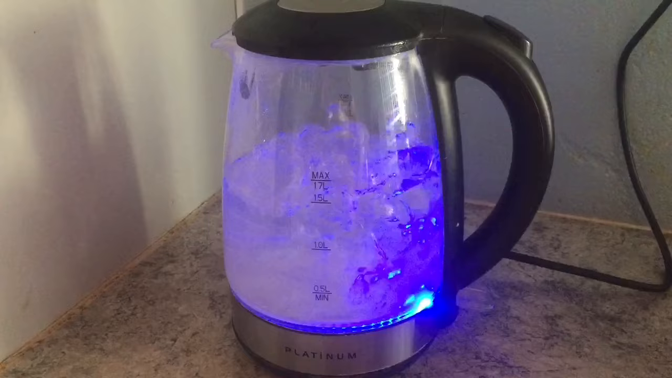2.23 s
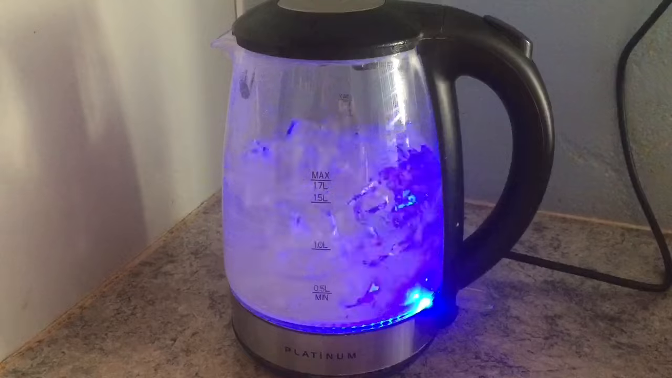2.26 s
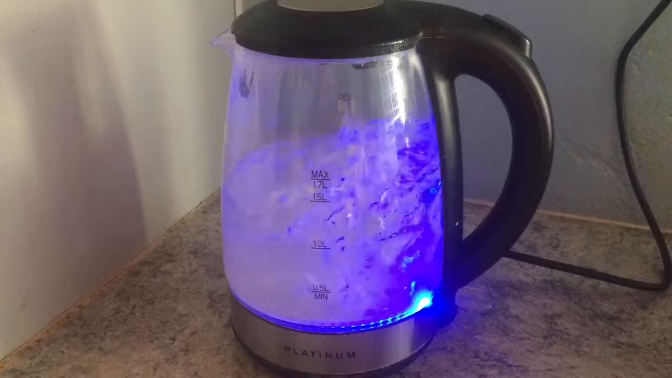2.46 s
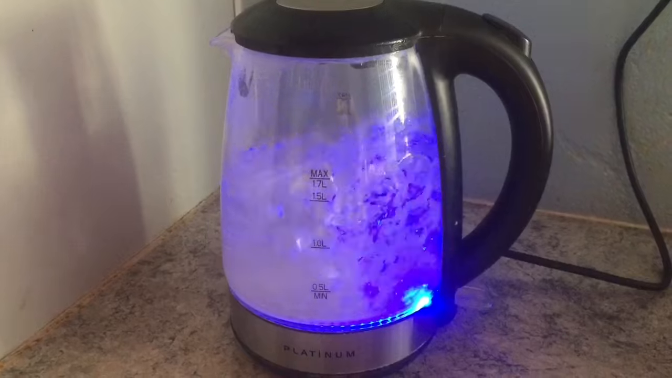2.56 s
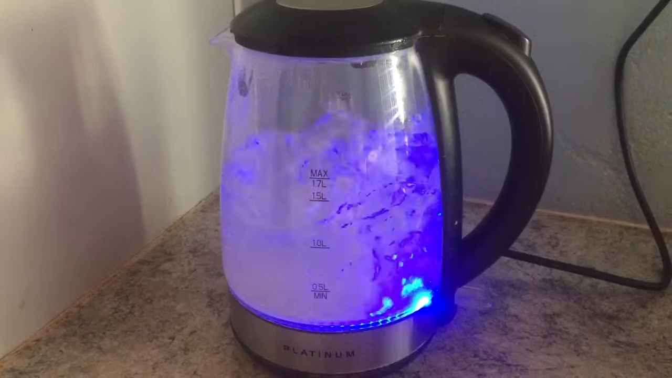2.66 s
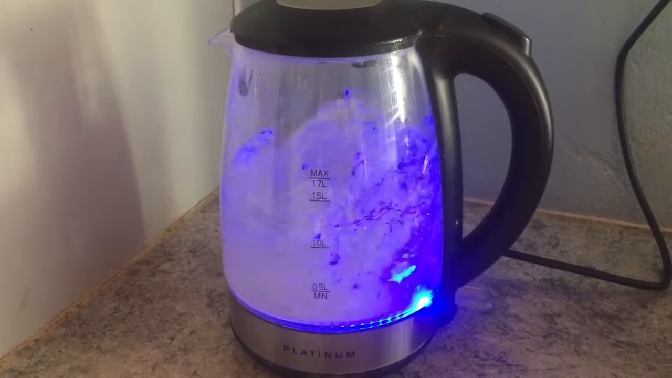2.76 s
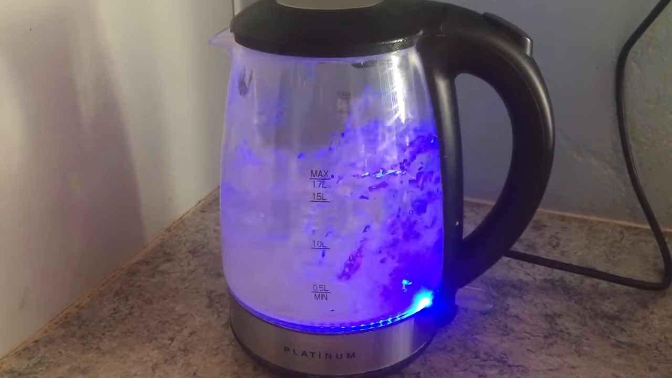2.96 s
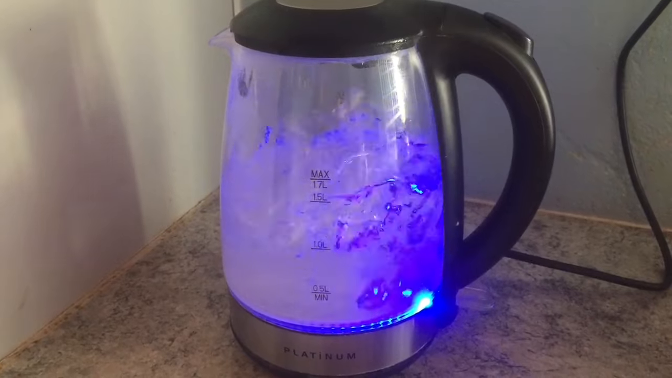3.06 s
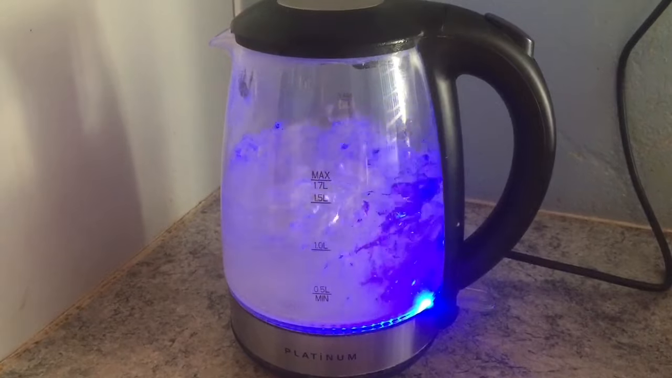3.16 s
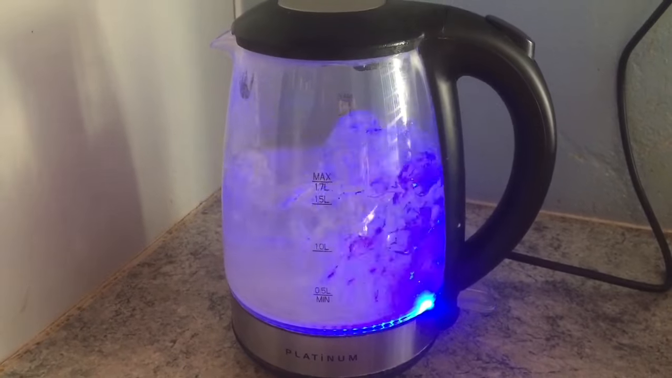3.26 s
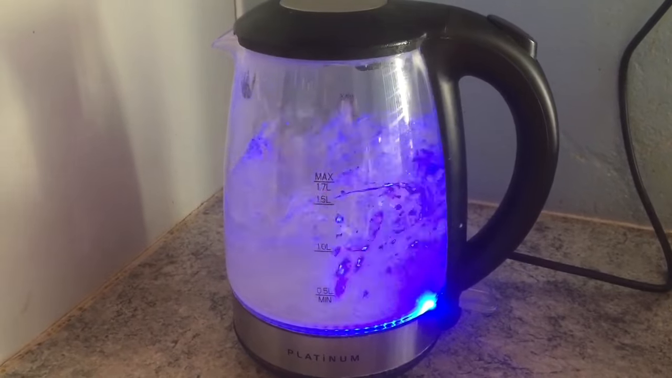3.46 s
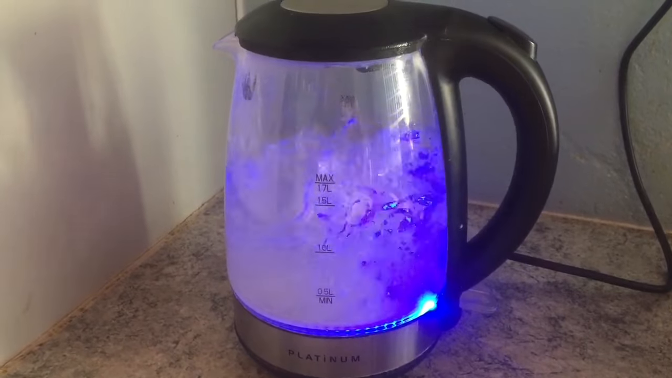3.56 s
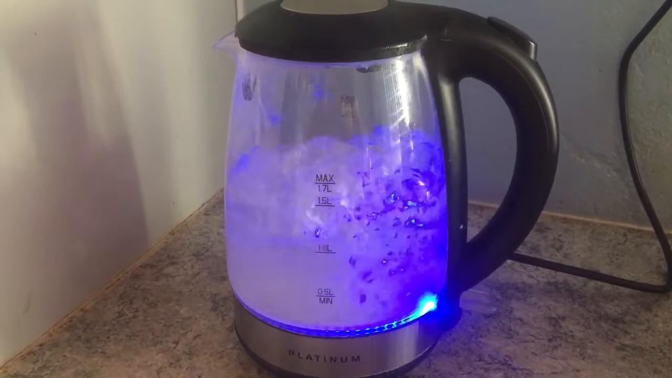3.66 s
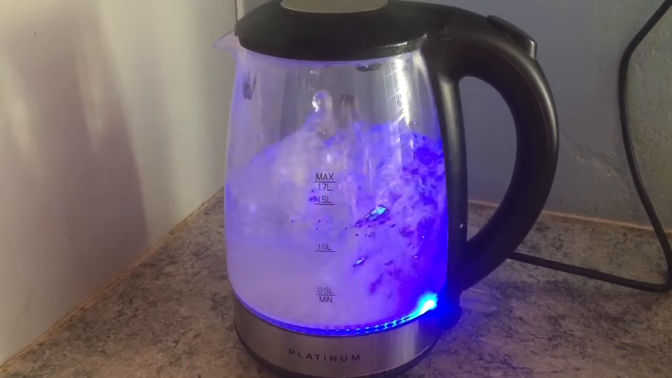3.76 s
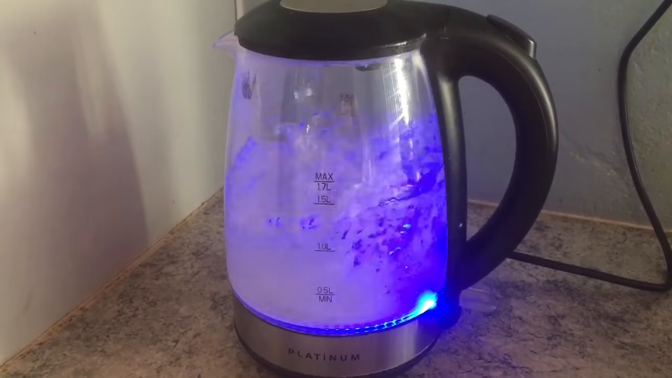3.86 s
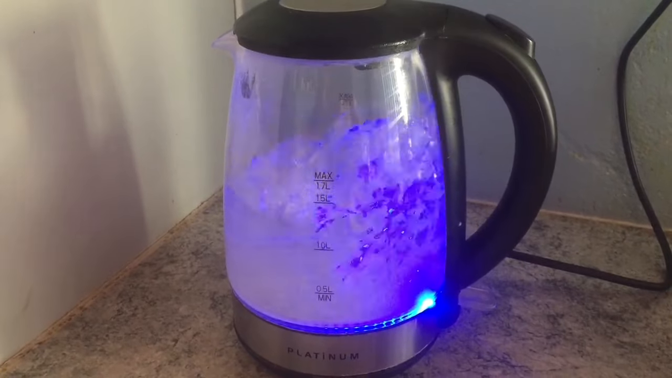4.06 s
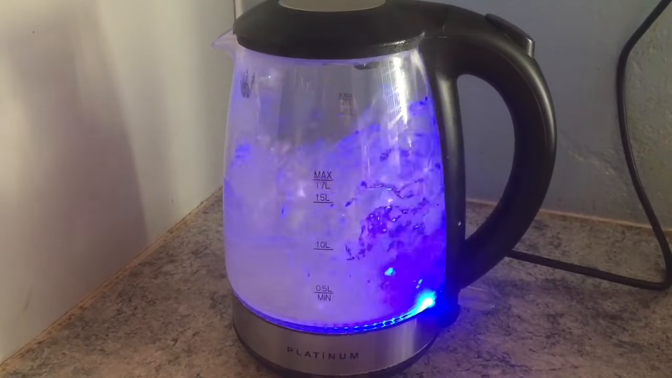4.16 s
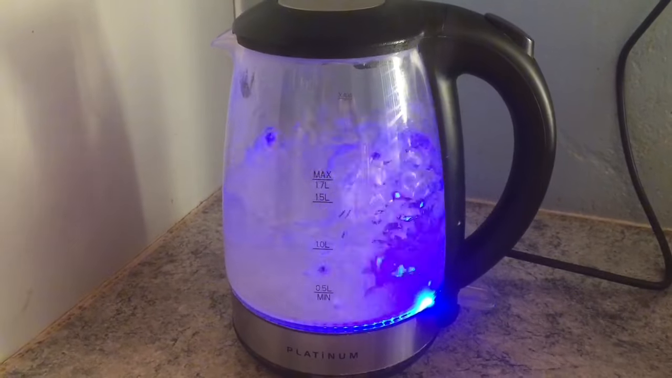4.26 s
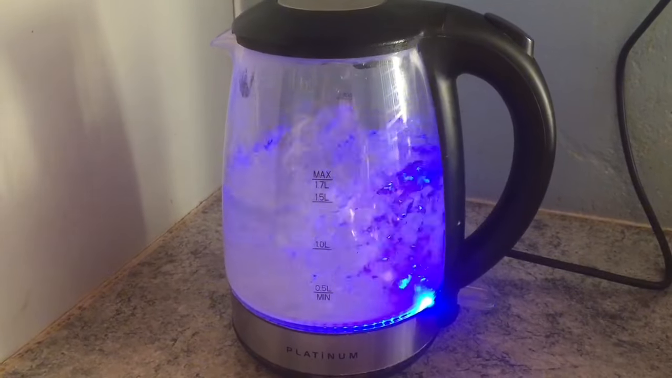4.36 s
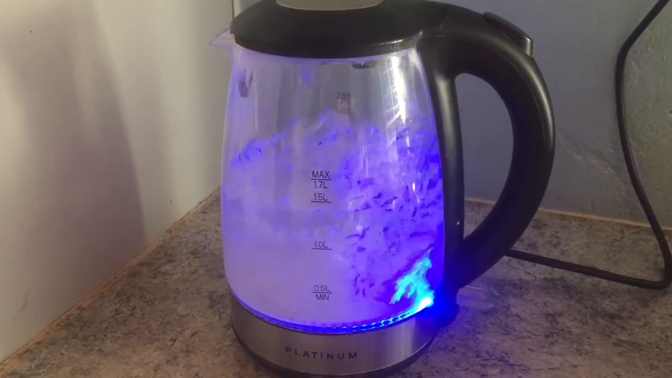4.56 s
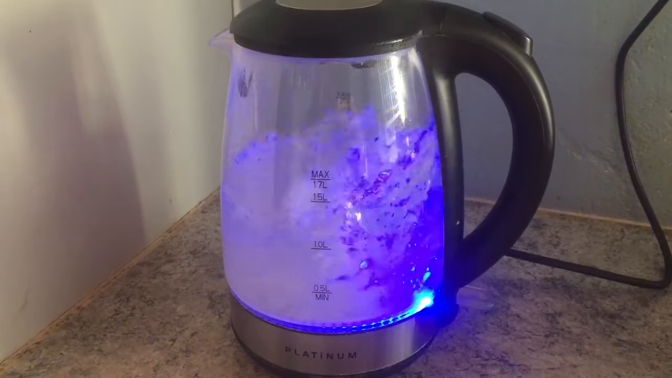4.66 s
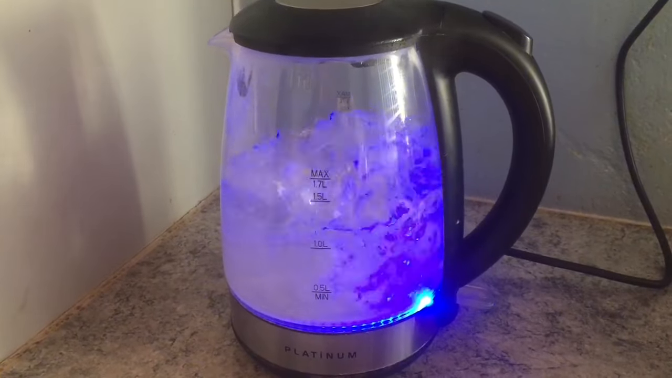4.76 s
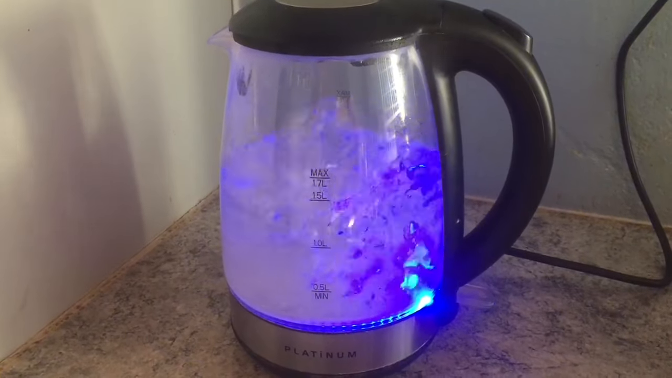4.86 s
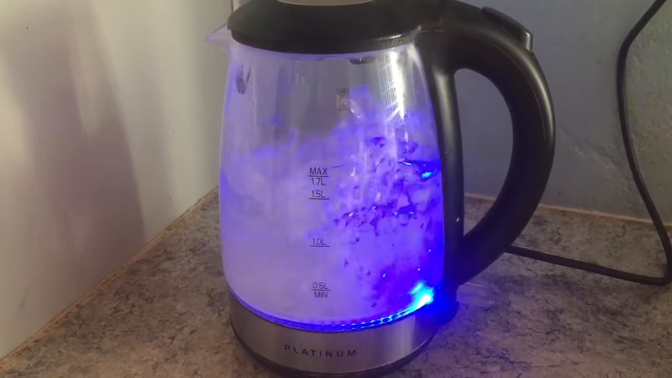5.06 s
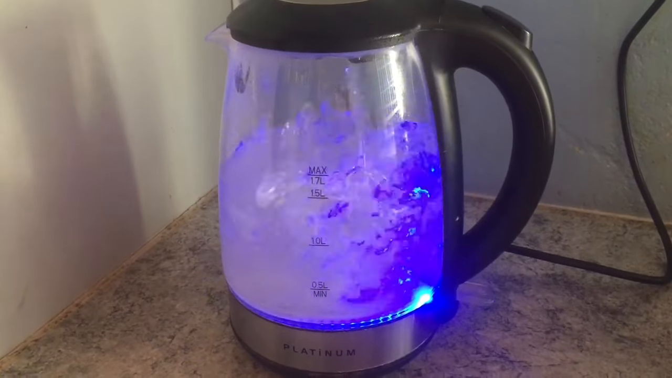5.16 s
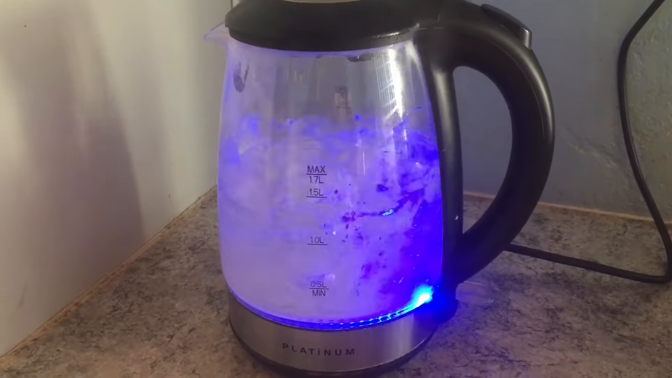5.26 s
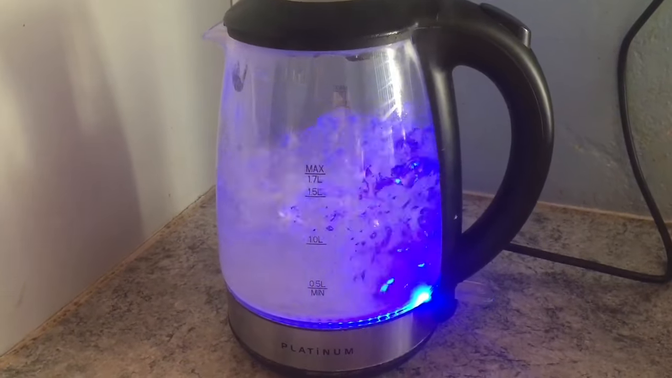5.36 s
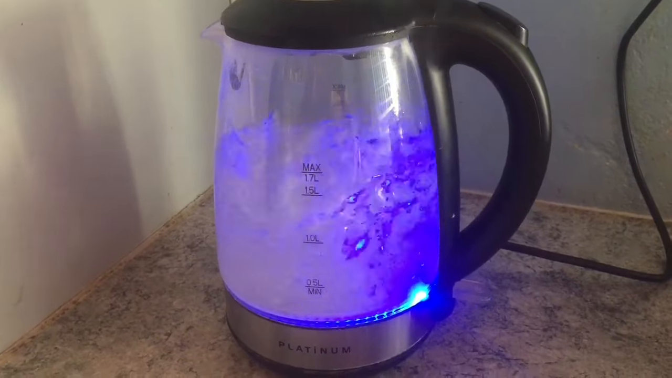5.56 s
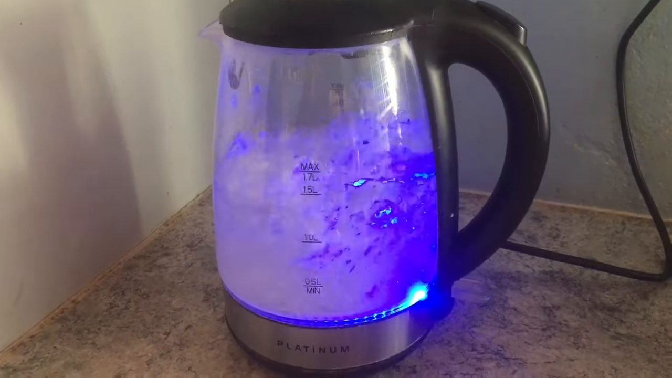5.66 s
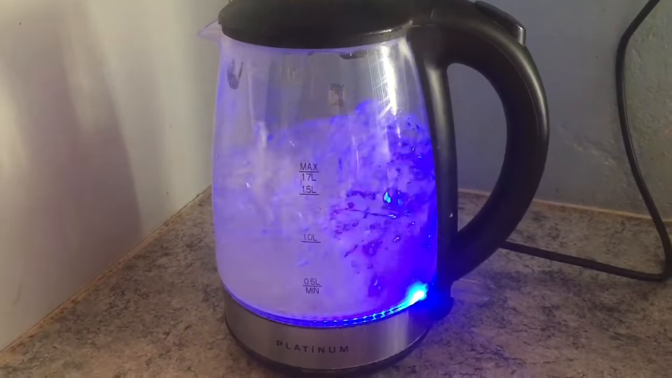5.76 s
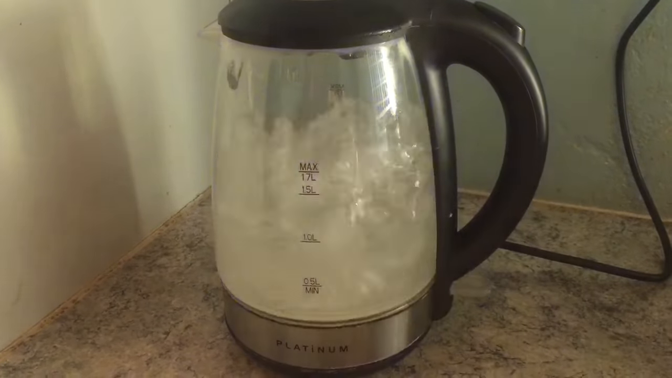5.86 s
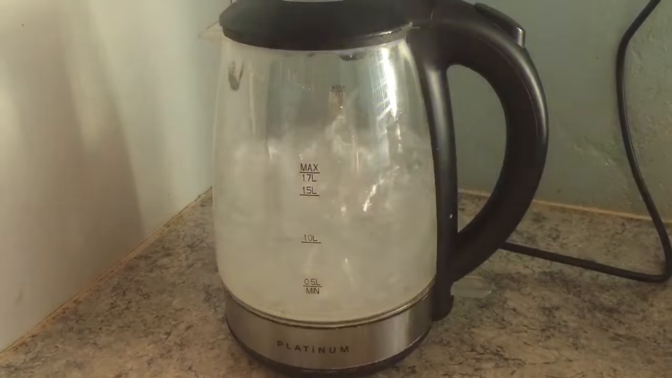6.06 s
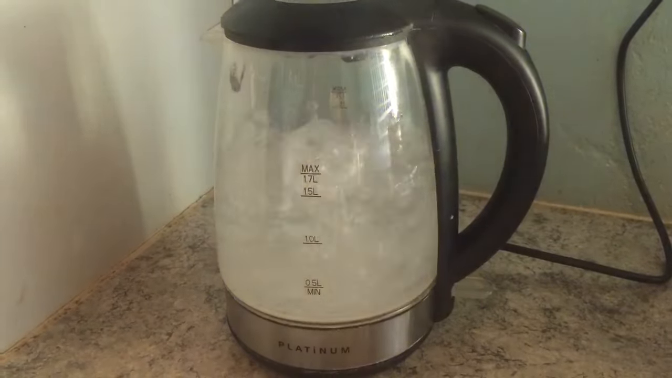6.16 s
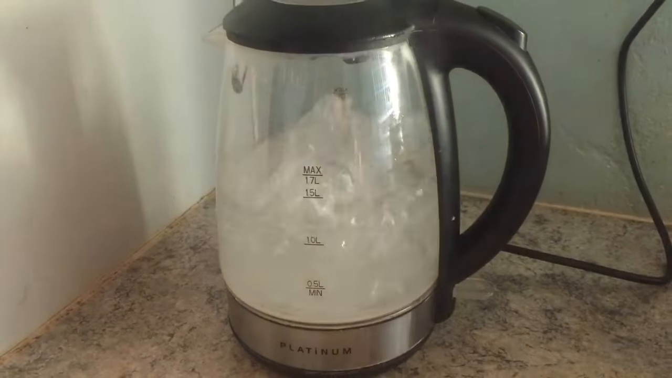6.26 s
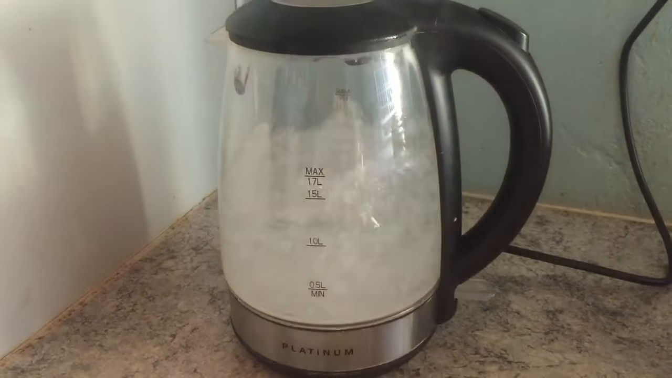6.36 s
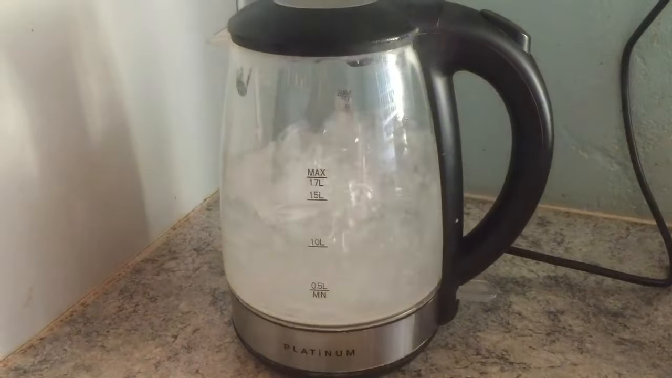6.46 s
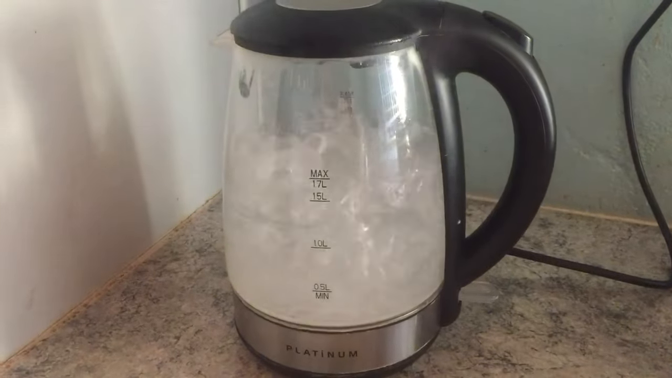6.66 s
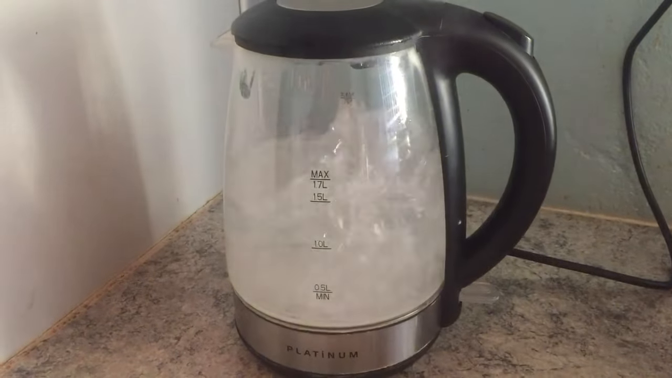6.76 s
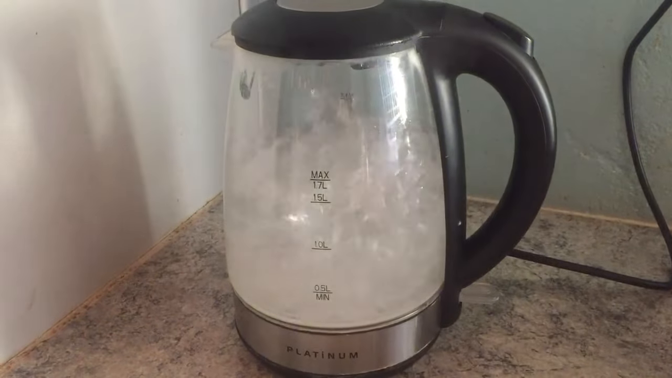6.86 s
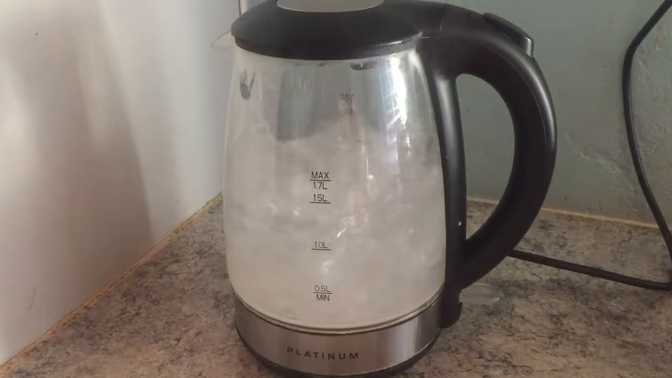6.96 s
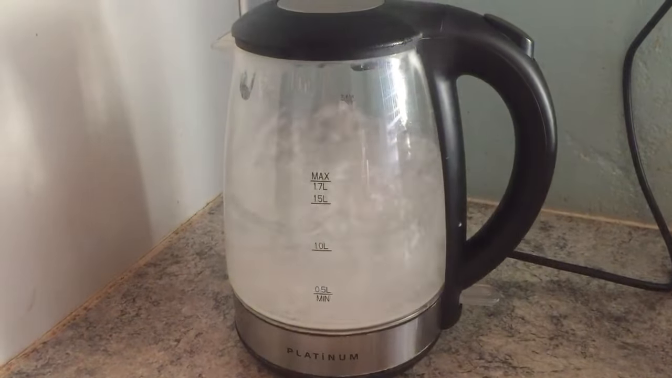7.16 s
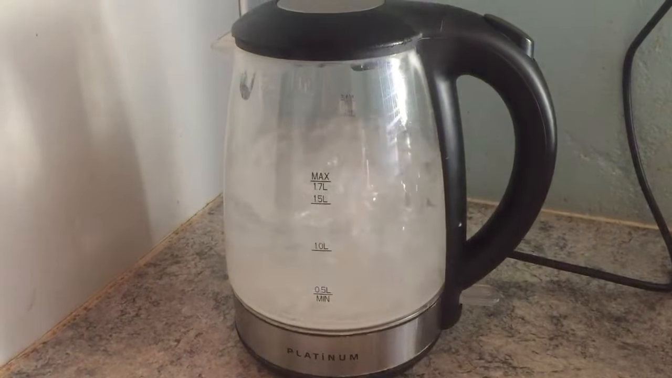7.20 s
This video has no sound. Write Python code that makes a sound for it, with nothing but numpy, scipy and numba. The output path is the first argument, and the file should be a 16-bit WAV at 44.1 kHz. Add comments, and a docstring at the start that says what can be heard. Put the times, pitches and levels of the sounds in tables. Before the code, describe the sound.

Water in a glass electric kettle bubbles at a rolling boil; the switch snaps off and the water keeps churning.

```python
"""A kitchen worktop, one microphone close to a glass electric kettle at a rolling boil.
Steam pockets heave and thump in the water; small bubbles ring as they pop and spray at the surface,
coloured by the glass jug. The thermostat switch snaps off while the water boils on.
The boil is heard between a hard start and a hard stop, over faint microphone hiss."""
import sys
import numpy as np
from scipy import signal
from scipy.fft import rfft, irfft
from scipy.io import wavfile
from scipy.ndimage import uniform_filter1d
from numba import njit

SR = 44100
rng = np.random.default_rng(int(sys.argv[2]) if len(sys.argv) > 2 else 0)


def generate_wav(signal):
    """Clip the signal to [-1, 1] and save it as 16-bit WAV at the path in sys.argv[1]."""
    frames = np.transpose(np.atleast_2d(signal))
    scaled = np.clip(frames, -1, 1) * 32767
    pcm = np.round(scaled).astype(np.int16)
    wavfile.write(sys.argv[1], SR, pcm)


N = 371145

# broad colour of jug, water and worktop: (frequency [Hz], gain [dB])
KETTLE_COLOUR = [(25, -37.5), (52, -7.5), (70, 3.5), (108, -5), (263, -1.5), (363, -12), (439, -10.5),
                 (545, -14.5), (641, -23.5), (1130, -16.5), (1940, -30.5), (2690, -40.5), (3430, -45),
                 (16000, -55.5)]


def undb(db):
    """dB to gain."""
    return 10 ** (np.asarray(db) / 20)


def level(x, db):
    """Scale to an rms level."""
    return x * undb(db) / np.sqrt(np.mean(x ** 2))


def colour(x, table):
    """Filter by a table of (frequency [Hz], gain [dB])."""
    hz, db = np.transpose(table)
    f = np.maximum(np.arange(len(x) // 2 + 1) * SR / len(x), 1)
    return irfft(rfft(x) * undb(np.interp(np.log(f), np.log(hz), db)), len(x))


def band_noise(lo_hz, hi_hz, n=N):
    """White noise through a steep band-pass."""
    band = signal.butter(3, [lo_hz, hi_hz], "band", fs=SR, output="sos")
    return signal.sosfilt(band, rng.standard_normal(n))


def walk(rate):
    """Random levels held 1 / rate s and smoothed twice; spread near 1."""
    hold = int(SR / rate)
    steps = np.repeat(rng.standard_normal(N // hold + 1), hold)
    smooth = uniform_filter1d(uniform_filter1d(steps, hold), hold)[:N]
    return 2 * np.tanh(smooth / smooth.std() / 2)


def microphone_hiss():
    """The microphone's faint, steady noise floor."""
    spectrum = [(20, -20.5), (77, -8), (234, -4), (1060, -7.5), (4940, -14), (16000, -22)]  # hiss colour: (frequency [Hz], gain [dB])
    return level(colour(rng.standard_normal(N), spectrum), -78)


def kitchen(x, t60, wet_db):
    """Add a short tail from glass, wall and worktop; the water moves, so each moment has its own."""
    hop, length, out = 1024, int(t60 * SR), np.zeros(N + SR)
    decay = undb(-60 * np.arange(length) / (t60 * SR))
    tails = decay * rng.standard_normal((N // hop - 1, length)) / np.sqrt(np.sum(decay ** 2))
    for k, tail in enumerate(tails):
        wet = signal.fftconvolve(x[k * hop:(k + 2) * hop] * np.hanning(2 * hop), tail)
        out[k * hop:k * hop + len(wet)] += wet
    return x + undb(wet_db) * out[:N]


def jug(x):
    """The kettle's broad colour with its narrow peaks and dips."""
    # resonances of glass and air space: (frequency [Hz], width [Hz], lift [dB])
    resonances = [(77.4, 10, 6), (283.2, 28, 4.5), (429.4, 18, 4.5), (544, 15, 3), (702, 35, 3.5),
                  (772, 30, -6.5), (1920, 220, 6), (2260, 79, -7.5), (2394, 190, 5), (3030, 89, -7.5),
                  (3454, 160, 8.5), (5350, 220, 6)]
    f = np.arange(len(x) // 2 + 1) * SR / len(x)
    lift_db = sum(db / (1 + (2 * (f - hz) / width) ** 2) for hz, width, db in resonances)
    return irfft(rfft(colour(x, KETTLE_COLOUR)) * undb(lift_db), len(x))


def vigour():
    """How hard the water boils, in dB at every sample."""
    boil = [(.13, 1), (.31, -2.5), (.73, -0.5), (3.8, 0), (4.43, 1.5), (4.55, -1), (4.67, 3.5), (4.88, -1),
            (5.14, 2.5), (5.23, -3.5), (5.3, 2), (6.12, -0.5), (7.39, 1), (7.46, -3.5), (7.53, 0.5),
            (7.92, -2.5), (8.03, 2), (8.1, 1)]  # strength of the boil: (time [s], level above the usual roll [dB])
    return np.interp(np.arange(N) / SR, *np.transpose(boil))


@njit
def ring(at, hz, peak, turns, cycles, glide):
    """Ringing bubbles: sines that peak after `cycles` periods and die away, sliding by `glide`."""
    out = np.zeros(N)
    for k in range(len(at)):
        start, rise, phase = int(at[k] * SR), cycles * SR / hz[k], 2 * np.pi * turns[k]
        for i in range(min(int(7 * rise), N - start)):
            age = i / rise
            phase += 2 * np.pi * hz[k] * (1 + glide * age) / SR
            out[start + i] += peak[k] * age * np.exp(1 - age) * np.sin(phase)
    return out


def bubbles(lo_hz, hi_hz, count, cycles, glide, spread_db, wash_db):
    """Random bubbles in the jug, a few louder than the rest, over a wash of countless others."""
    when, pitch, big, turns = rng.random((count, 4)).T
    hz = lo_hz * (hi_hz / lo_hz) ** pitch
    # peaks grow with pitch, so the swarm is white before the jug colours it
    peak = hz * undb(spread_db * np.minimum(-np.log(1 - big), 3.5))
    swarm = level(ring(when * N / SR, hz, peak, turns, cycles, glide), 0)
    wash = level(band_noise(lo_hz, hi_hz), wash_db)
    return level(jug(swarm + wash), 0)


def splashes(at, db, hz, count, span_s, octaves, cycles, glide):
    """Each is a lead bubble in a quieter crowd that gathers just before it and thins out behind."""
    early, late, apart, small, turns = np.moveaxis(rng.random((len(at), count, 5)), 2, 0)
    early[:, 0], late[:, 0], apart[:, 0], small[:, 0] = 0, 0, .5, 0  # the lead bubble
    when = np.maximum(at[:, None] + span_s * (np.log(1 - early) / 3.2 - np.log(1 - late)), 0)
    pitch = np.clip(hz[:, None] * 2 ** (octaves * (2 * apart - 1)), 500, 15000)
    peak = undb(db[:, None] - 3.4 * (small > 0) - 12.7 * small) * np.sqrt(hz[:, None] / pitch)
    return ring(when.ravel(), pitch.ravel(), peak.ravel(), turns.ravel(), cycles, glide)


def steam():
    """A thin, steady hiss of steam."""
    return level(colour(band_noise(3970, 15800), KETTLE_COLOUR), -77.5)


def surface():
    """Gurgle and fizz surge together among small splashes and bright spits against the glass."""
    surge, flicker = walk(16), walk(11)
    gurgle = bubbles(620, 2930, count=8000, cycles=2.56, glide=.03, spread_db=2.5, wash_db=-6)
    gurgle *= undb(1.2 * surge)
    fizz = bubbles(2397, 15500, count=8000, cycles=5.5, glide=.01, spread_db=2, wash_db=-3.5)
    fizz *= undb(.72 * surge + 2.3 * flicker)
    when, big, pitch = rng.random((320, 3)).T
    hz = 2000 * 3.8 ** pitch
    small = splashes(when * N / SR, 8 * big ** 2 + 19 * np.log10(hz), hz,
                     count=30, span_s=.011, octaves=.8, cycles=4.5, glide=.022)
    when, big, pitch = rng.random((520, 3)).T
    spits = splashes(when * N / SR, 10 * big ** 2 + 14 * pitch, 4200 * 2.1 ** pitch,
                     count=40, span_s=.005, octaves=1.4, cycles=6.5, glide=0.)
    bed = level(gurgle, 1.4) + level(fizz, -16.5) + level(jug(small), -11) + level(jug(spits), -11)
    return bed * undb(-55.5 + .98 * vigour())


def spray():
    """Droplets thrown against the glass patter in high clusters."""
    throws = [(0.496, -59, 5250), (1.012, -53.5, 8960), (1.029, -69, 10000), (1.465, -61, 5960),
              (1.5142, -57, 5530), (1.626, -59, 4500), (1.708, -62, 6600), (1.807, -59.5, 8000),
              (2.1446, -57, 5500), (2.504, -59.5, 6040), (3.1818, -64, 9000), (3.2774, -56, 4970),
              (3.457, -60.5, 7000), (4.434, -58, 5860), (4.8564, -56, 6600), (5.1449, -59.5, 7500),
              (5.31, -55.5, 5400), (6.1985, -53, 5000), (7.02, -61.5, 6960), (7.0657, -57, 5500),
              (7.127, -57, 5520), (7.504, -56, 5660)]  # bursts of spray: (time [s], lead droplet peak [dB], centre pitch [Hz])
    at, db, hz = np.transpose(throws)
    return splashes(at, db, hz, count=60, span_s=.005, octaves=.97, cycles=4.5, glide=.005)


def pops():
    """Bubbles burst at the surface, each a plink inside a softer splash."""
    bursts = [(0.352, -49, 3360), (1.182, -47, 1270), (1.184, -48.5, 2800), (1.269, -49.5, 1060),
              (1.6785, -43.5, 1160), (1.953, -51, 3080), (2.144, -44, 2920), (2.223, -43, 1900),
              (2.072, -48, 1900), (2.424, -40.5, 1935), (2.438, -39, 1160), (2.4887, -46, 1910),
              (2.633, -45, 1135), (2.8047, -46, 2870), (2.86, -48, 3160), (2.919, -47, 3710),
              (3.0598, -45.5, 1790), (3.278, -40, 2005), (3.623, -48, 1170), (4.1057, -48, 940),
              (4.1773, -45.5, 2420), (4.178, -54, 3300), (4.327, -46, 1690), (4.429, -43, 2570),
              (4.6006, -43.5, 1220), (4.837, -46.5, 3220), (4.9537, -44, 1810), (4.9964, -46, 2120),
              (5.312, -42.5, 1610), (5.322, -42, 1730), (5.5368, -40.5, 1254), (6.14, -42, 2400),
              (6.1979, -40.5, 2100), (6.7557, -44, 1140), (7.0027, -51.5, 3040), (7.1287, -42.5, 1117),
              (7.3312, -44.5, 1665), (7.369, -50, 2450), (7.7204, -37, 1690), (7.7235, -45, 2700)]  # bursting bubbles: (time [s], plink peak [dB], pitch [Hz])
    at, db, hz = np.transpose(bursts)
    crowd = splashes(at, db - 3, hz, count=30, span_s=.006, octaves=.512, cycles=2.3, glide=.039)
    return crowd + ring(at, hz, undb(db), np.zeros(len(at)), cycles=3.55, glide=.00475)


def glugs():
    """Round glugs in the water, ringing higher than the thumps."""
    gulps = [(1.272, -40), (1.641, -38), (2.12, -37.5), (2.321, -38), (2.426, -37), (2.942, -39),
             (6.522, -41), (6.62, -39), (7.142, -36.5)]  # single glugs: (time [s], peak [dB])
    at, db = np.transpose(gulps)
    hz = np.full(len(at), 532.)
    return ring(at, hz, undb(db), rng.random(len(at)), cycles=2.3, glide=0.)


def deep_swells():
    """Brief deep swells in the boil's low rumble, near 77 Hz."""
    swells = [(0.426, -29.5), (0.593, -31.5), (0.994, -35), (1.49, -31), (3.029, -35), (4.019, -30),
              (4.34, -29), (4.435, -34), (5.293, -30.5), (5.412, -31.5), (6.891, -36), (7.255, -32.5),
              (7.724, -33.5)]  # low swells: (time [s], peak [dB])
    at, db = np.transpose(swells)
    hz = np.full(len(at), 77.1)
    return ring(at, hz, undb(db), np.zeros(len(at)), cycles=1.27, glide=0.)


def thumps():
    """Big steam pockets collapse, each also knocking the air space under the lid."""
    pockets = [(0.117, -32, 266), (0.577, -24, 218), (0.741, -27, 204), (0.804, -28, 273),
               (0.99, -25.5, 266), (1.126, -28.5, 220), (1.267, -24.5, 260), (1.459, -28.5, 212),
               (1.586, -26, 270), (1.641, -27, 238), (2.017, -30, 286), (2.435, -23, 180),
               (2.844, -26.5, 269), (3.031, -27.5, 287), (3.204, -26, 253), (4.362, -24.5, 198),
               (4.644, -20.5, 262), (4.757, -24, 464), (5.512, -27.5, 186), (5.813, -25.5, 287),
               (6.677, -27.5, 272), (6.811, -26, 278), (7.141, -29.5, 482), (7.157, -25, 270),
               (7.576, -28.5, 246), (8.009, -28.5, 205)]  # collapses: (time [s], peak [dB], pitch [Hz])
    at, db, hz = np.transpose(pockets)
    collapse = ring(at, hz, undb(db), rng.random(len(at)), cycles=1.06, glide=-.01)
    air_hz = np.full(len(at), 435.)
    return collapse + ring(at, air_hz, undb(db - 8.5), rng.random(len(at)), cycles=2.3, glide=0.)


def rolling_water():
    """Steam pockets make a low, churning heave with a shudder under it; both follow the boil."""
    heave = bubbles(99.9, 632, count=2500, cycles=.8, glide=0., spread_db=1.75, wash_db=-7.5)
    shudder = bubbles(30, 103.7, count=400, cycles=1.8, glide=0., spread_db=.5, wash_db=-7)
    churn_db = 1.61 * walk(38)
    return heave * undb(-37 + vigour() + churn_db) + shudder * undb(-44.5 + .72 * vigour())


def switch(lands_s):
    """The thermostat lever gathers speed and lands: crack, knock, ringing handle and dying rattle."""
    # modes of handle and switch: (frequency [Hz], relative level [dB], time to fall 60 dB [s])
    modes = [(1128, -12, 0.03), (1270, -6.5, 0.054), (1527, -2, 0.06), (1740, -1.5, 0.04),
             (2110, -8, 0.025), (2460, -11, 0.02), (2720, -14.5, 0.024), (2950, -13.5, 0.025),
             (4400, -19, 0.02), (6520, -19.5, 0.02)]
    travel_s, n = .005, SR // 2
    t = np.arange(n) / SR - travel_s
    build = np.exp(-(np.minimum(t + .0015, 0) / .0011) ** 2)
    after = np.maximum(t, 0)
    hz, db, t60 = np.transpose(modes)[:, :, None]
    turns = rng.random(hz.shape) * (db < -3) / 2  # the strongest modes start in phase
    tones = np.sum(undb(db - 60 * after / t60) * np.sin(2 * np.pi * (hz * t + turns)), axis=0)
    crack = band_noise(2300, 6900, n) + .4 * band_noise(10000, 15800, n)
    crack *= undb(-9) * np.exp(-np.maximum(t - .004, 0) / .005)
    rattle = undb(-1) * band_noise(1240, 1920, n) * np.exp(-after / .052)
    sizzle = undb(-23) * band_noise(1925, 5800, n) * np.exp(-after / .058)
    air = undb(-30) * band_noise(9500, 15740, n) * np.exp(-after / .025)
    knock = undb(-3.5) * band_noise(310, 1200, n) * np.exp(-after / .026)
    out, start = np.zeros(N), int((lands_s - travel_s) * SR)
    out[start:start + n] = undb(-17) * build * (tones + crack + rattle + sizzle + air + knock)
    return out


def scene():
    """The kettle from close by: the low water stays dry, surface and switch get the kitchen's tail."""
    water = rolling_water() + thumps() + glugs() + deep_swells()
    bright = surface() + steam() + pops() + spray() + switch(lands_s=5.9838)
    return (water + kitchen(bright, t60=.085, wet_db=-9))[None]


def record(dry):
    """The microphone loses the deepest bass; the boil cuts in and out over hiss; the top is cut."""
    start_s, stop_s, fade_s = .1144, 8.106, .0011
    t = np.arange(N) / SR
    gate = np.clip(np.minimum(t - start_s, stop_s - t) / fade_s, 0, 1)
    low_cut = signal.butter(2, 45, "high", fs=SR, output="sos")
    top_cut = signal.ellip(10, .2, 60, 15900, fs=SR, output="sos")
    return signal.sosfilt(top_cut, signal.sosfilt(low_cut, dry) * gate + microphone_hiss())


dry = scene()
out = record(dry)
generate_wav(out)
```